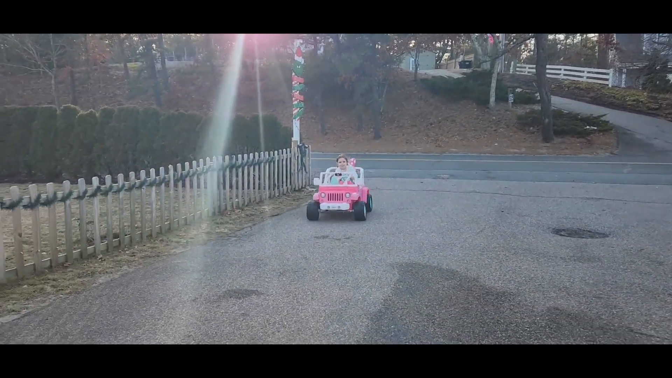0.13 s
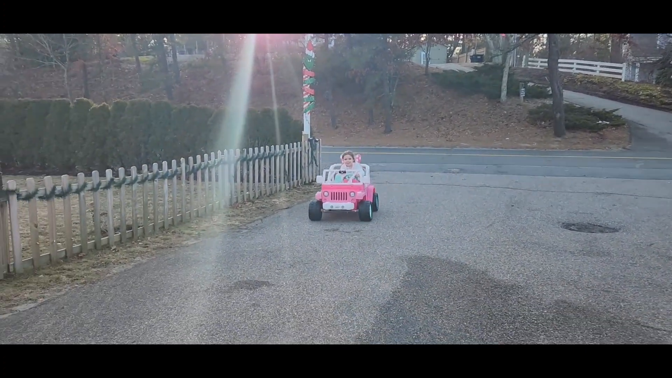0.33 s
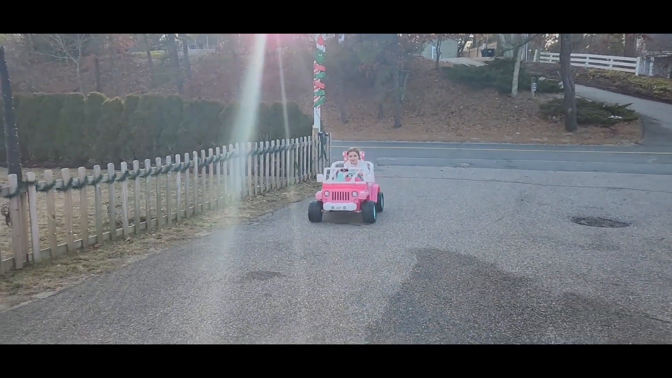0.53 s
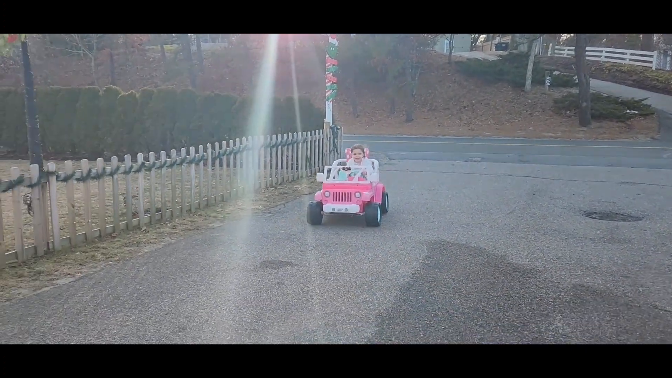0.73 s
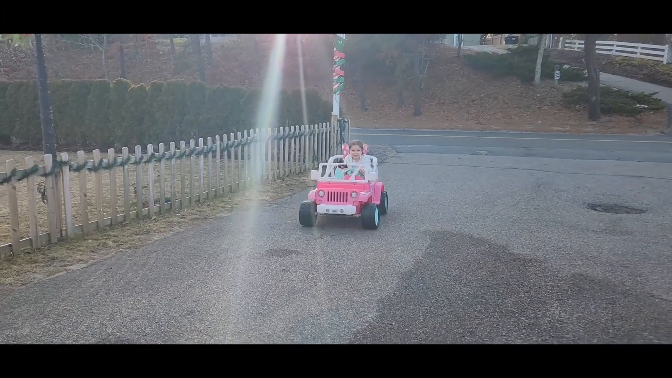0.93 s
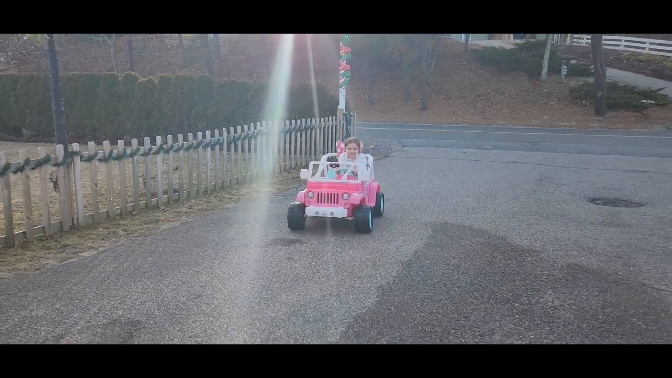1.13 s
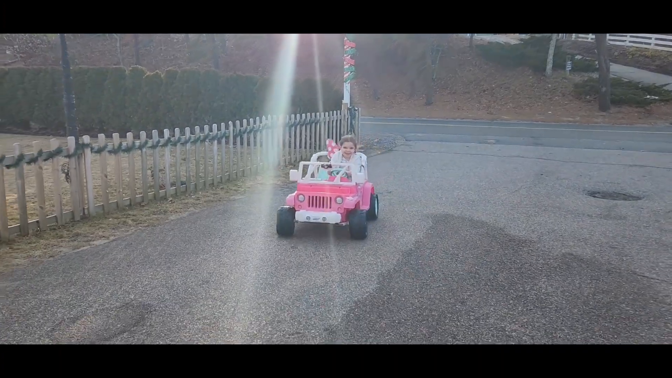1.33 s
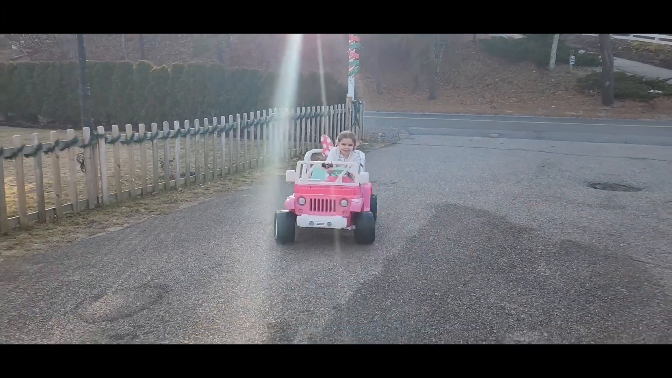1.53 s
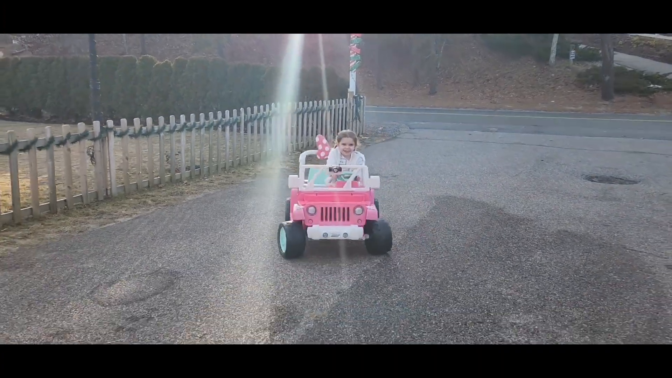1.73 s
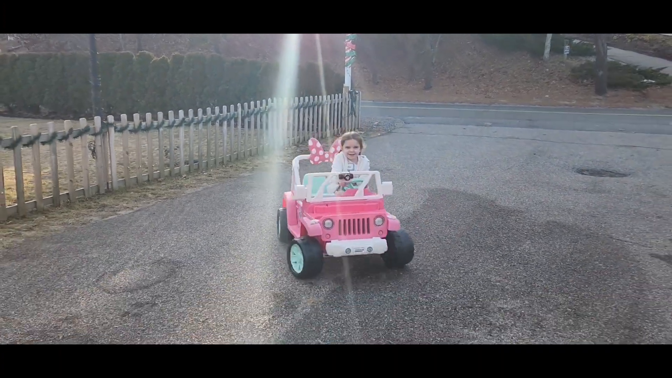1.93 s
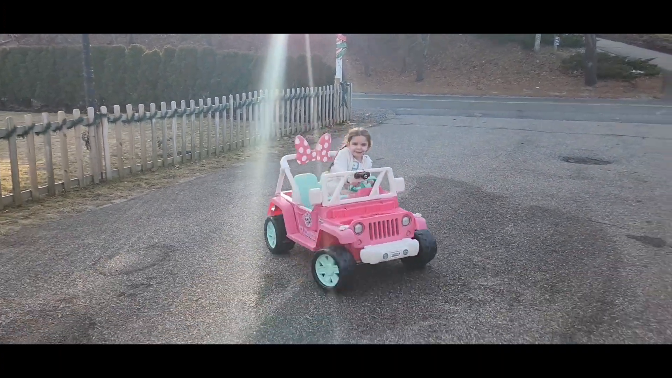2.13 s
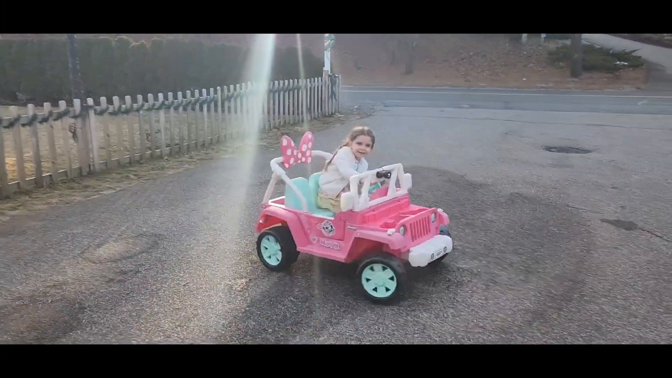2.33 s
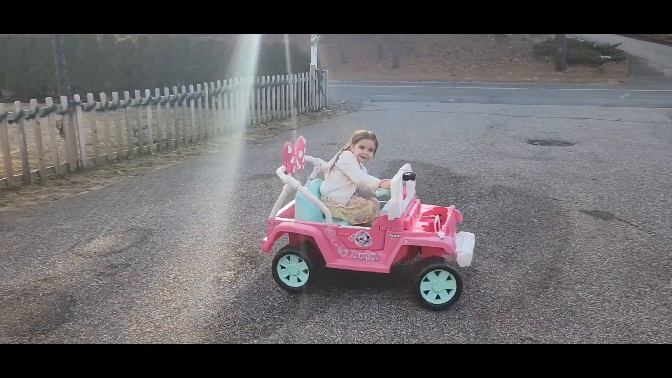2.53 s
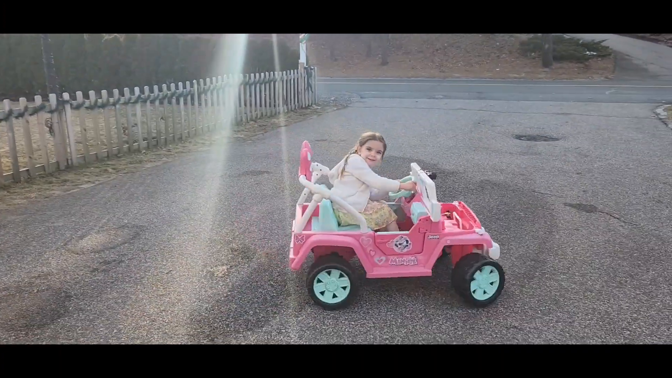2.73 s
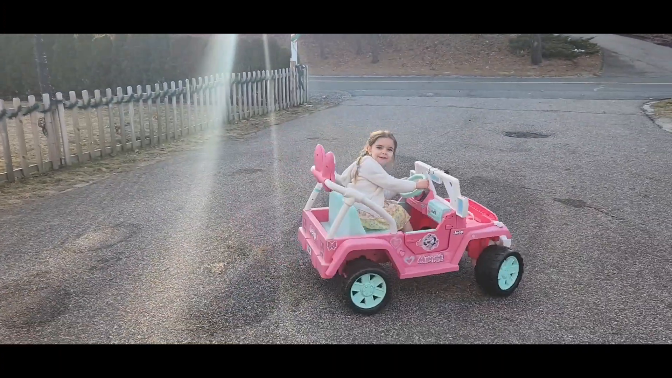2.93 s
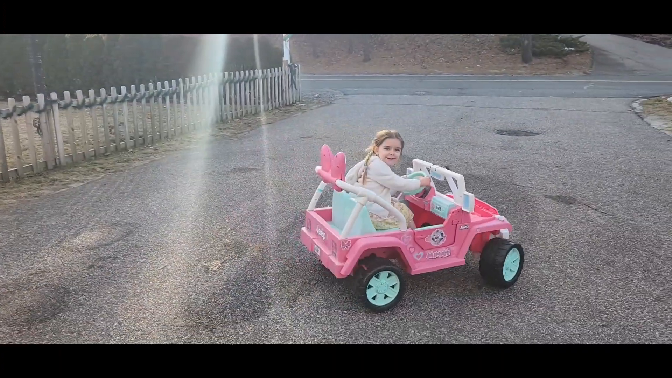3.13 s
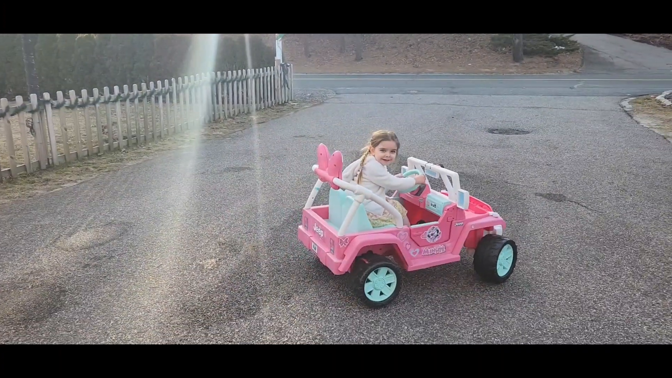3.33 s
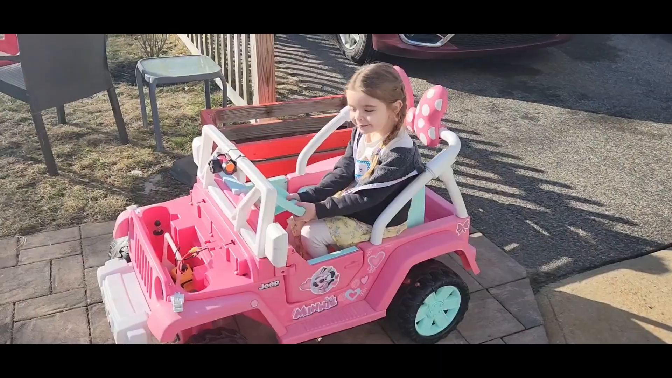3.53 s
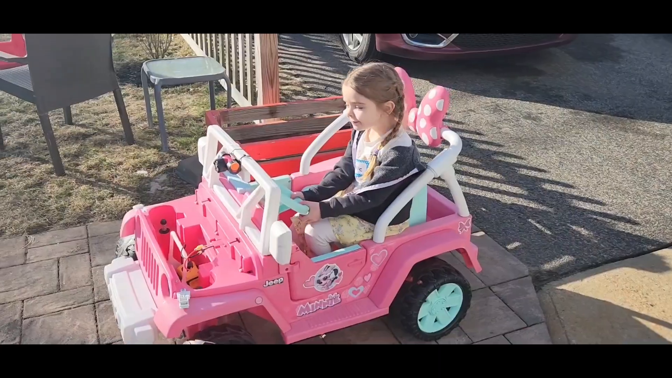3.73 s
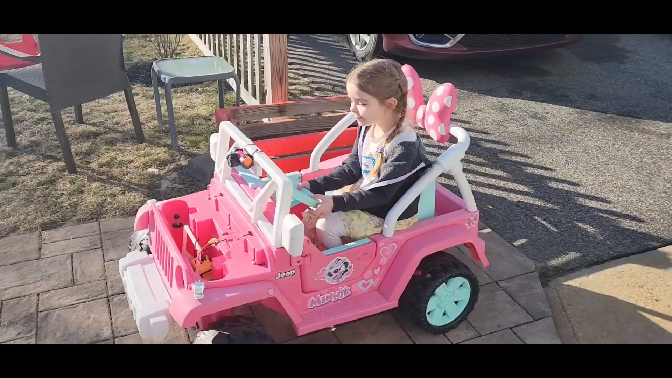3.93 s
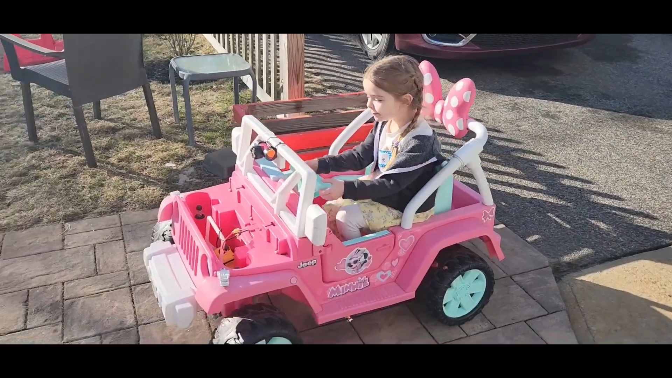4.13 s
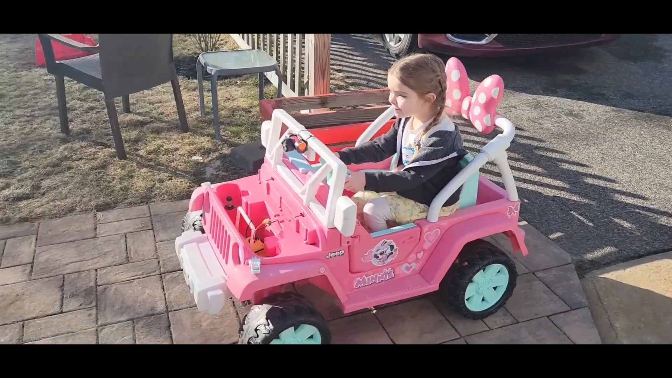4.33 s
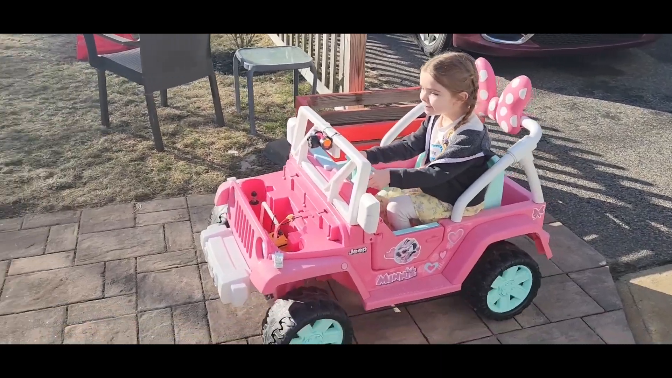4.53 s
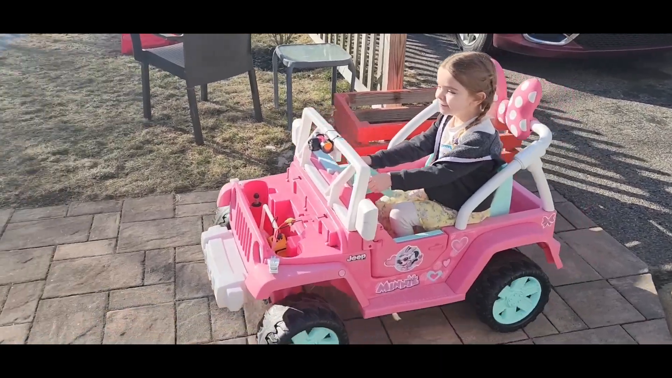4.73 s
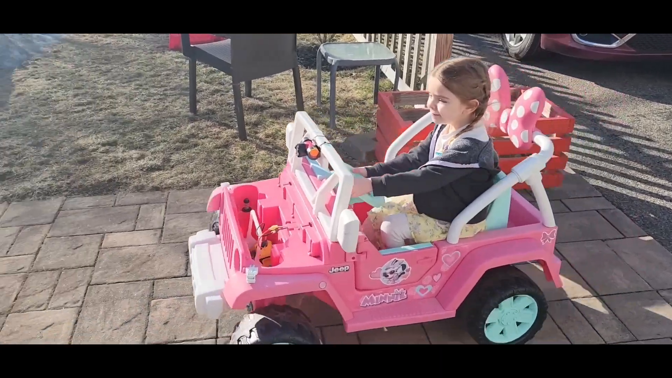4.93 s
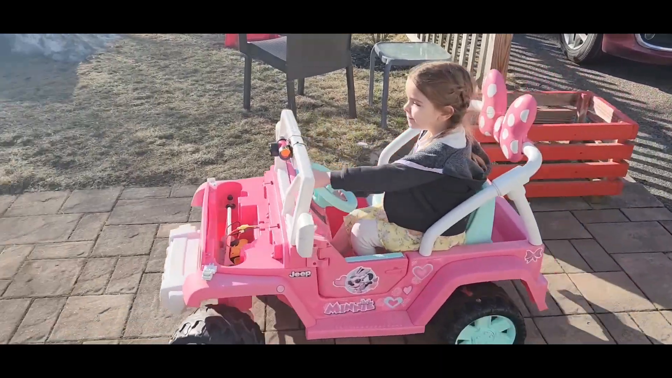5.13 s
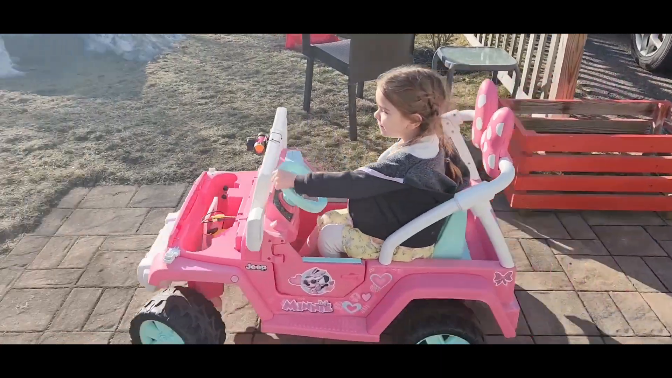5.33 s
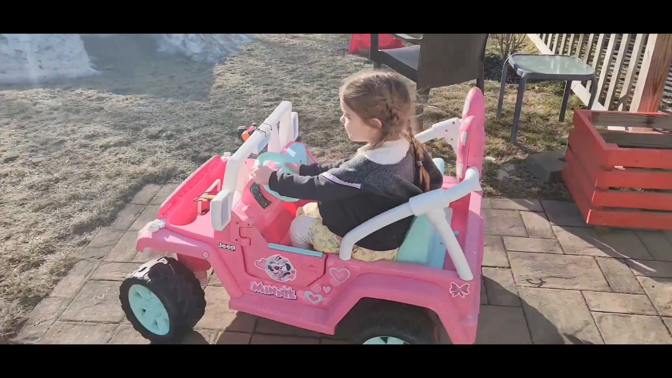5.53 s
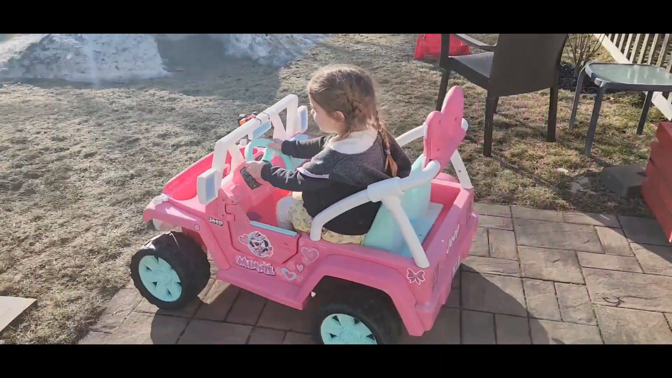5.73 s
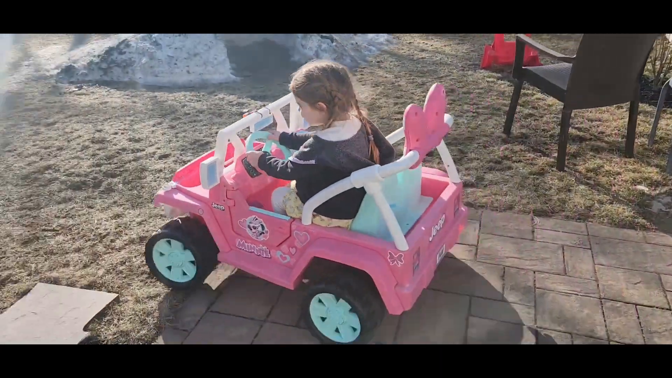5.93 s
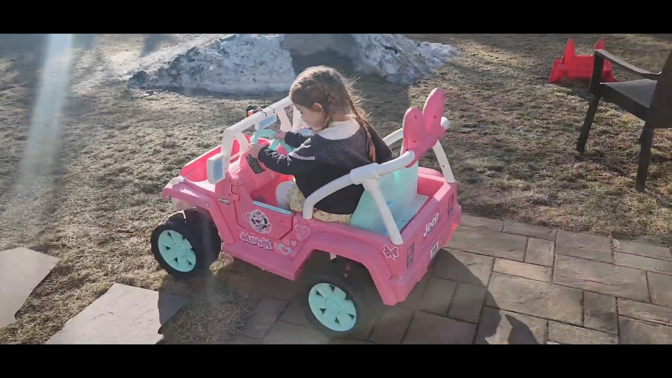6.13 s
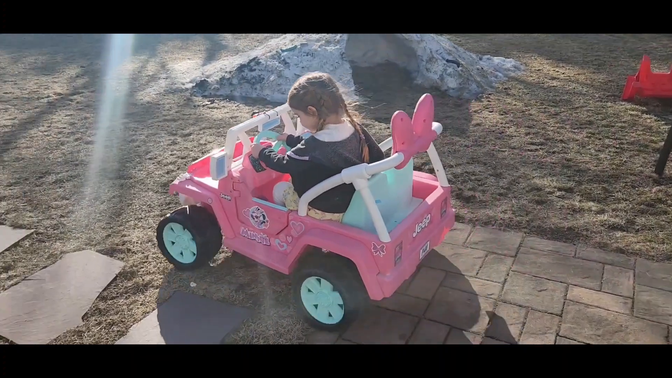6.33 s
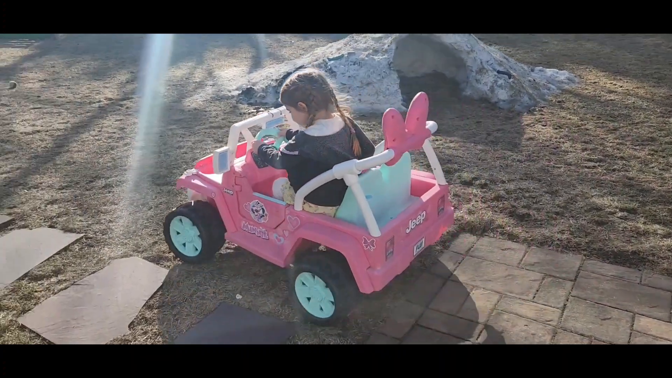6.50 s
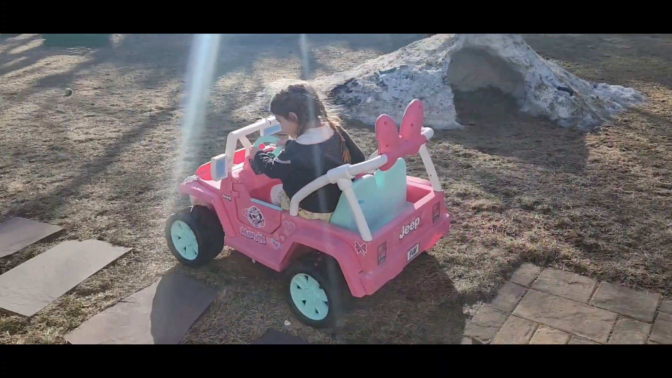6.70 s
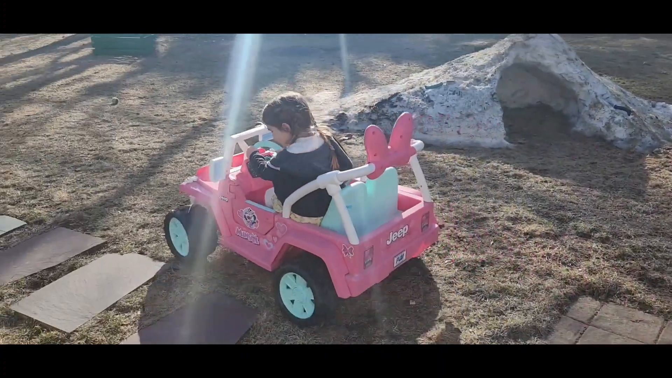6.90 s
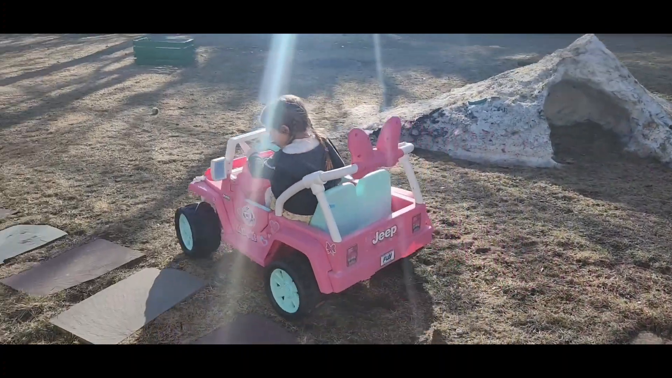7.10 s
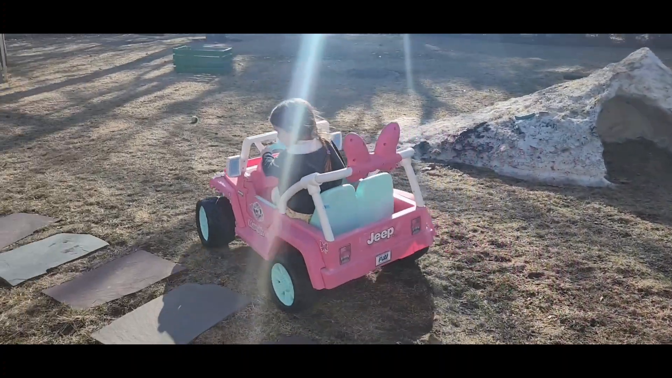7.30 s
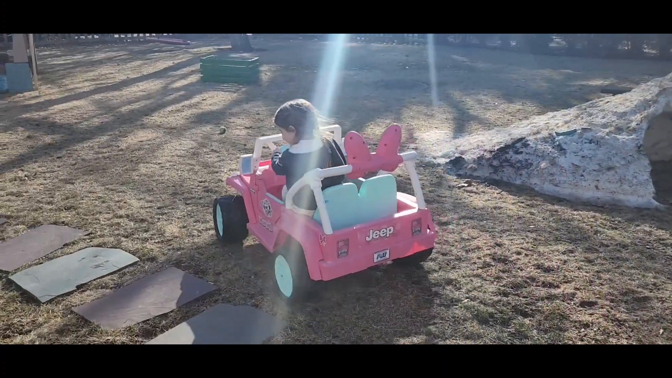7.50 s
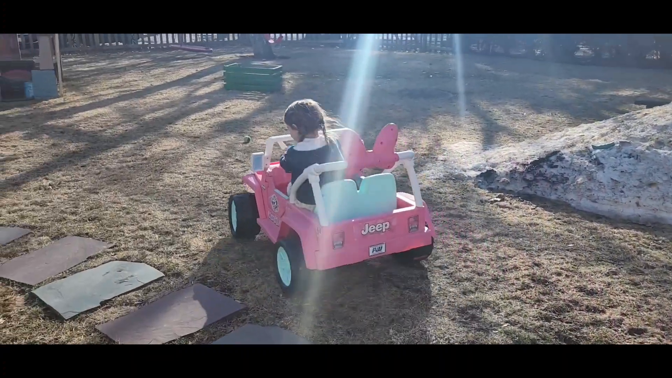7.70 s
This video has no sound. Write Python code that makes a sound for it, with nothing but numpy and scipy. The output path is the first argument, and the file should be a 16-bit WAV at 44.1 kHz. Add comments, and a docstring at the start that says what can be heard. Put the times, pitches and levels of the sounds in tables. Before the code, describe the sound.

Outdoors, a battery ride-on toy car rolls up an asphalt driveway, its hollow plastic wheels drumming, crunching and knocking while geared motors whir. It turns with heavier scrubs and stops. After a tiny gap and a quiet second of faint hiss, it jerks into motion on a paved patio, squeaking and thumping, then rattles away over a lawn. A phone microphone hears it fairly close, with low air rumble.

```python
"""Hollow plastic wheels drum and crunch up an asphalt driveway: a battery ride-on toy car rolls, turns and stops.
In a second scene it starts on a paved patio and drives off over a lawn.
Random tread bumps ring the wheels and tub and crack the grit; timed blows, slips and chirps add knocks, thumps,
scrubs, snaps and squeaks. Two geared motors whir from uneven tooth strikes and bent sines.
A phone with two microphone ports hears it outdoors, over a rumble of air and a faint far hiss."""
import sys
import numpy as np
from scipy import signal
from scipy.fft import rfft, irfft, next_fast_len
from scipy.io import wavfile
from scipy.ndimage import uniform_filter1d, map_coordinates

SR = 44100
rng = np.random.default_rng(int(sys.argv[2]) if len(sys.argv) > 2 else 0)


def dump(signal):
    """Clip the signal to [-1, 1] and save it as 16-bit WAV at the path in sys.argv[1]."""
    limited = np.clip(np.atleast_2d(signal).T, -1, 1)
    pcm = np.round(limited * 32767).astype(np.int16)
    wavfile.write(sys.argv[1], SR, pcm)


N = 342216

# Most dB in the tables are relative to their layer's gain; air and scrub levels are used as they stand.

# Air moving at the ports. Each row: time in seconds, rumble level in dB.
AIR_LEVEL = [(0, -38), (3.3, -40.5), (3.53, -53), (3.6, -43), (4.1, -40.5), (4.4, -38), (5.5, -35.5),
             (7.4, -38), (7.58, -35), (7.63, -28.5), (7.76, -34.5)]
# Colours of the air rumble and of the far hiss. Each row: frequency in Hz, level in dB.
AIR_COLOUR = [(12, -32), (20, -12), (54, 10.5), (81, 4.5), (146, -15), (187, -22), (200, -31), (260, -59),
              (440, -120)]
FAR_HISS_COLOUR = [(88, -44), (150, -2.5), (182, -3), (201, -6), (285, -5.5), (455, -12.5), (817, -10.5),
                   (1090, -15.5), (2120, -10.5), (2840, -21.5), (5520, -18.5), (6700, -20.5), (7830, -22),
                   (10700, -34.5), (15800, -27.5)]

# The two microphone ports. Each row: frequency in Hz, likeness of left and right from 0 to 1.
PORT_LIKENESS = [(40, 0.93), (120, 1), (300, .98), (600, 1), (1200, 0.38), (3000, 0.047), (12000, 0.18)]
# Each row: frequency in Hz, time in seconds by which the left port leads.
LEFT_LEAD = [(400, 0.00014), (1000, 0.00012), (3000, 0.000266)]
# The gap between the two scenes: start and end in seconds.
SCENE_GAP_S = (3.538, 3.581)
PHONE_TOP_HZ = 15650

# Stones and joints snapping. Each row: time in seconds, peak in dB.
SNAPS = [(0.263, -19), (0.342, -36), (0.7286, -17), (1.449, -17), (1.5904, -17), (1.8305, -15),
         (1.871, -12), (2.163, -13), (2.5523, -8), (2.5668, -14), (2.6027, -14), (2.622, -9), (3.259, -34),
         (3.3816, -38), (3.521, -39), (3.949, -37), (5.0454, -13), (5.271, -19), (5.6037, -20.5),
         (5.8062, -19), (5.9517, -10.5), (6.5552, -16)]
# Plastic rubbing on the axles. Each row: time in seconds, peak in dB, pitch in Hz.
SQUEAKS = [(1.224, -9, 5500), (1.46, -10, 7270), (1.869, 1.5, 6200), (2.273, -5, 6183), (4.572, -16, 4660),
           (4.615, -11, 3400), (5.043, 1.5, 3300), (6.651, -11, 3850), (6.937, -16, 4340)]
# An axle chattering. Each row: start in seconds, end in seconds, peak in dB, first pitch in Hz, last pitch in Hz.
SQUEAK_RUNS = [(4.873, 4.973, -17, 6000, 4970), (5.122, 5.203, -12.5, 4350, 4220),
               (5.24, 5.34, -13.5, 3630, 3450)]

# Course of the motors. Each row: time in seconds, pace as a share of full speed, level in dB.
MOTOR_COURSE = [(0, 0.9, -44), (1, 0.96, -28.5), (2, 0.97, -42), (2.55, 0.88, -21), (2.85, 0.76, -30.5),
                (3.01, 0.82, -30), (3.1, 0.83, -43), (3.3, 0.72, -45), (3.42, 0.47, -63), (4.52, 0.44, -93),
                (4.56, 0.81, -28.5), (4.7, 0.92, -28.5), (5.1, 1, -27.5), (5.55, 0.83, -29), (6, 1.01, -32),
                (6.75, 0.99, -31.5), (7.25, 1.02, -32.5), (7.4, 0.955, -35), (7.76, 1.02, -36.5)]
# Gearbox housing resonances. Each row: frequency in Hz, width in Hz, level in dB.
GEARBOX_MODES = [(598, 168, 9.5), (1234, 920, 5.5), (1510, 149, 8), (2000, 143, -5.5), (3280, 760, -11.5),
                 (4140, 880, -38), (7700, 210, -22)]
# Tooth rates at full pace, before each motor's own speed factor
GEAR_HZ, PINION_HZ = 578.1, 2148
# Whine against the gearboxes; its gain were the rear to face the listener fully
PINION_DB, PINION_REAR_DB = -9.5, 5
# The rear swings round toward the listener: start and end in seconds, the end lying past the last sample.
REAR_TURN_S = (7.3, 8.32)

# Blows on the tub. Each row: time in seconds, peak in dB, panel pitch in Hz, bright edge in dB.
KNOCKS = [(0.021, -13, 966, -18), (0.343, -7.5, 1210, -16), (0.743, -10.5, 780, -23),
          (0.875, -12.5, 670, -22), (1.013, -13, 650, -29), (1.138, -12.5, 611, -20),
          (1.281, -11.5, 700, -6), (1.299, -9.5, 2400, -18), (1.449, -9.5, 1930, -5),
          (1.577, -9.5, 840, -15), (1.829, -11, 1640, -10), (1.874, -9, 810, -8), (2.117, -12, 650, -6),
          (2.207, -10.5, 800, -14), (2.463, -7, 1070, -9), (2.523, -7, 1310, -24), (2.691, -8, 1210, -20),
          (2.895, -18, 1364, -7), (4.547, -27, 618, -19), (4.81, -13.5, 560, -20), (5.038, -9, 1460, -8),
          (5.065, -10, 641, -17), (5.328, -9.5, 600, -8), (5.396, -5.5, 740, -27), (5.478, -13.5, 614, -14),
          (5.536, -21, 1440, -26), (5.673, -8, 815, -26), (5.766, -9, 1470, -26), (5.834, -15, 556, -22),
          (5.95, -10, 1257, -20), (5.999, -11, 587, -22), (6.069, -39, 604, -21), (6.239, -16, 600, -33),
          (6.354, -33, 1466, -22), (6.479, -12.5, 500, -24), (6.56, -16, 1485, -16)]
# Tub resonances. Each row: frequency in Hz, width in Hz, level in dB.
TUB_MODES = [(600, 580, -6), (896, 45, 2.5), (1092, 26, 2.5), (1325, 39, 2), (1497, 61, 3),
             (2370, 180, -2.5), (2660, 250, -11.5), (3540, 430, -14)]
# A wheel drops into a crack or joint. Each row: time in seconds, peak in dB, pitch in Hz.
THUMPS = [(0.099, -13, 131), (0.695, -7.5, 200), (0.936, -7.5, 198), (1.005, -4.5, 167), (1.133, -7, 167),
          (1.313, -8, 173), (1.609, -6.5, 170), (1.779, -11, 186), (1.868, -9, 160), (2.006, -10, 210),
          (2.21, -12, 215), (2.057, -12, 150), (2.129, -1, 174), (2.305, -1, 107), (2.579, -11, 106),
          (2.693, -5, 155), (2.928, -10, 186), (3.263, -15.5, 107), (4.573, -4, 143.3), (4.784, -3, 118),
          (4.935, -2.5, 103.6), (5.062, -2, 151), (5.305, -8, 106), (5.337, -18, 171), (5.462, -11, 227),
          (5.832, -7, 240), (5.991, -4.5, 158), (6.23, -4.5, 275.3), (6.301, -14, 200), (6.412, -10, 128),
          (6.5, -7, 193), (6.606, -12, 125), (6.734, -24, 110), (6.804, -12.5, 204), (6.961, -14.5, 218)]
# A tyre slips and scrubs over grit. Each row: middle in seconds, half length in seconds, level in dB.
SCRUBS = [(0.005, 0.028, -23), (0.284, 0.025, -32), (0.733, 0.017, -27), (0.9, 0.024, -30),
          (1.076, 0.018, -25), (1.175, 0.02, -30), (1.277, 0.03, -29), (1.463, 0.018, -29),
          (1.607, 0.025, -27), (1.886, 0.037, -21), (2.125, 0.015, -23), (2.198, 0.043, -19.5),
          (2.483, 0.022, -25), (2.58, 0.088, -29), (2.722, 0.032, -14.5), (3.026, 0.033, -25.5),
          (4.796, 0.023, -22.5), (5.045, 0.022, -21), (5.815, 0.015, -31), (5.962, 0.017, -21),
          (6.68, 0.028, -33), (7.533, 0.025, -29.5)]

# How hard the car rolls, by its speed and nearness. Each row: time in seconds, level in dB.
ROLL_LEVEL = [(0, -4.5), (0.6, -5.5), (0.9, -3), (1.7, -1), (2.05, 1), (2.74, -1), (2.86, -9.5), (2.95, 4),
              (3.03, 0), (3.11, -11.5), (3.29, -19.5), (3.38, -37), (4.53, -68), (4.57, -6), (5.24, -6),
              (5.38, -0.5), (5.55, -3), (5.7, -1.5), (6.55, -5), (6.72, -10), (7.76, -9)]
# Hollow wheels and tub floor as each stretch excites them. Each row: frequency in Hz, width in Hz, level in dB.
DRUM_APPROACH = [(103, 31, -3.5), (142, 34, -2.5), (186, 34.6, -0.5), (240, 58, -6.5)]
DRUM_TURN = [(100.6, 19.5, -3), (121, 8.6, 1.5), (166, 49, -7), (257, 37, -14)]
DRUM_START = [(104, 15, -3.5), (158, 63, -11.5), (225, 36, -10.5), (298, 62, -13)]
DRUM_PATIO = [(64, 31.7, -6.5), (116.5, 28, 0), (172, 32, -2.5), (232, 37, -1), (307, 56, -5.5)]
DRUM_LAWN = [(136.8, 49, -4), (198, 17, 2), (292.4, 55, -3.5)]
# Colours of the body rattle, by side heard or ground. Each row: frequency in Hz, level in dB.
BODY_FRONT = [(160, -33), (280, -4), (319, -6), (493, 0), (763, -10), (842, -7.5), (1240, -9), (1440, -12),
              (2060, -16.5), (2250, -13.5), (2480, -19), (3000, -20.5), (3900, -23), (6600, -120)]
BODY_SIDE = [(160, -32), (280, -4.5), (297, -3), (385, -1), (508, -3), (651, -12.5), (949, -9.5),
             (1030, -11.5), (1200, -5.5), (1530, -10), (1770, -13.5), (2640, -17.5), (3000, -18.5),
             (3900, -42), (6600, -120)]
BODY_PATIO = [(160, -17), (280, -4), (366, -3.5), (446, -7.5), (561, -2.5), (657, -6.5), (851, -13.5),
              (949, -8.5), (1020, -12), (1480, -6), (1760, -18.5), (2120, -12.5), (2640, -27),
              (3000, -23.5), (3900, -55), (6600, -120)]
BODY_LAWN = [(180, -31), (300, 1), (385, -8.5), (450, 3), (578, 0.5), (630, -6), (694, -1), (866, -9),
             (1060, -4), (1220, -3), (1470, -5.5), (1570, -8.5), (2080, -3.5), (2700, -14), (3000, -14),
             (3900, -50), (6600, -120)]
# Colours of the grit on each ground. Each row: frequency in Hz, level in dB.
GRIT_ASPHALT = [(1470, -4.5), (2500, -2.5), (3540, -2), (5080, -5.5), (6210, -3), (7530, -4), (8590, -12.5),
                (9720, -18.5), (12600, -11.5), (13900, -14.5), (15000, -21), (15800, -12)]
GRIT_PAVERS = [(1470, -36), (2500, 2.5), (2680, -7), (3330, -1.5), (4160, -1.5), (5240, -4.5), (7420, -4),
               (9420, -18.5), (12200, -10.5), (14700, -10), (15400, -18), (15800, -21)]
GRIT_LAWN = [(1470, -17), (2500, -5), (3560, -7.5), (4320, -8), (5200, -12.5), (7250, -11.5), (9720, -30),
             (11200, -21.5), (13000, -17), (15000, -25), (15800, -19)]


def amp(db):
    """Decibels to an amplitude factor."""
    return 10 ** (np.asarray(db) / 20)


def unit(x):
    """x scaled to rms 1."""
    return x / np.sqrt(np.mean(x ** 2) + 1e-20)


def peaked(x):
    """x scaled to a peak of 1."""
    return x / np.abs(x).max()


def along(points, hz):
    """(Hz, value) points read on a log frequency axis."""
    f, v = np.transpose(points)
    return np.interp(np.log(hz + 1), np.log(f + 1), v)


def curves(rows):
    """One value per sample for each column after the time."""
    s, *cols = np.transpose(rows)
    return [np.interp(np.arange(N) / SR, s, c) for c in cols]


def wobble(rate):
    """A smooth random curve, rate knots a second."""
    knots = rng.standard_normal(int(N * rate / SR) + 4)
    return map_coordinates(knots, [np.arange(N) * rate / SR])


def add(out, s, x):
    """Mix x into out from time s."""
    part = out[:, max(round(s * SR), 0):][:, :x.shape[1]]
    part += x[:, :part.shape[1]]


def filtered(x, response):
    """x times a complex response of frequency."""
    n = x.shape[-1]
    m = next_fast_len(n + 8192)
    return irfft(rfft(x, m) * response(np.fft.rfftfreq(m, 1 / SR)), m)[..., :n]


def coloured(x, spectrum):
    """x through a causal minimum-phase filter with the given (Hz, dB) points."""
    size = 8192
    db = np.maximum(along(spectrum, np.fft.rfftfreq(size, 1 / SR)), -90)
    cepstrum = irfft(np.log(amp(db)))
    # folding the cepstrum forward in time makes the filter causal
    cepstrum[1:size // 2] *= 2
    cepstrum[size // 2 + 1:] = 0
    kernel = irfft(np.exp(rfft(cepstrum)))
    return signal.fftconvolve(x, kernel[None], axes=1)[:, :x.shape[1]]


def resonate(x, modes):
    """x through a sum of resonances (Hz, width in Hz, dB) of alternating sign."""
    def response(f):
        return sum((-1) ** k * amp(db) * 1j * f * width / (hz * hz - f * f + 1j * f * width)
                   for k, (hz, width, db) in enumerate(modes))
    return filtered(x, response)


def ports(pair):
    """Two unrelated signals become left and right of joint rms 1, alike in the bass."""
    def mid_side_gains(hz):
        turn = np.arccos(np.clip(along(PORT_LIKENESS, hz), 0, .999)) / 2
        return np.array([np.cos(turn), np.sin(turn)])
    mid, side = filtered(pair, mid_side_gains)
    return unit(np.array([mid + side, mid - side]))


def burst(t60):
    """The dense ring of one contact at two ports, 60 dB down after t60 seconds."""
    t = np.arange(SR // 5) / SR
    return rng.standard_normal((2, len(t))) * amp(-60 * t / t60)


def strike(t60, ring):
    """A hard contact: a sharp kick of force with a dense ring."""
    x = ring * burst(t60)
    x[:, 0] += [1, .5]
    return x


def contacts(n, rate, spread_db, t60, count=6):
    """n samples of random small impacts, rate a second, shared among count parts that each ring in their own way."""
    out = np.zeros((2, n))
    for _ in range(count):
        hit = rng.random(n) < rate / count / SR
        size = amp(spread_db * np.clip(rng.standard_normal(n), -2, 2))
        out += signal.oaconvolve((hit * size)[None], burst(t60), axes=1)[:, :n]
    return out


def outdoors():
    """Air rumbles at the ports over a faint far hiss, which is louder by the patio."""
    air_db, = curves(AIR_LEVEL)
    rumble = amp(air_db + wobble(6.5)) * ports(coloured(rng.standard_normal((2, N)), AIR_COLOUR))
    hiss_gain = np.where(np.arange(N) < SCENE_GAP_S[0] * SR, amp(-62), amp(-44.5))
    return rumble + hiss_gain * ports(coloured(rng.standard_normal((2, N)), FAR_HISS_COLOUR))


def snaps():
    """A stone or joint lets go with a sharp tick and a short plastic ring."""
    out = np.zeros((2, N))
    for s, db in SNAPS:
        tick_and_ring = burst(t60=0.0065) + 0.21 * burst(t60=0.19)
        add(out, s, amp(db + 10.5) * peaked(ports(coloured(tick_and_ring, GRIT_ASPHALT))))
    return out


def chirp(hz, rise=0.0091, waver=0.036, sag=0.73):
    """A brief, scratchy stick-slip squeak: it swells in rise seconds and sags by a share of its pitch a second."""
    t = np.arange(SR // 10) / SR
    swell = (t / rise) ** 2 * np.exp(2 - 2 * t / rise)
    scratch = unit(uniform_filter1d(rng.standard_normal((2, len(t))), 60))
    pitch = hz * (1 - sag * (t - rise) + waver * scratch)
    return swell * np.sin(2 * np.pi * np.cumsum(pitch, axis=1) / SR)


def squeaks(rate=27, scatter=0.02, spread_db=2):
    """Axles squeak singly, and in runs of rate a second, unevenly timed, while the pitch drifts."""
    out = np.zeros((2, N))
    for s, db, hz in SQUEAKS:
        add(out, s - .006, amp(db - 15.5) * chirp(hz))
    for start, end, db, first_hz, last_hz in SQUEAK_RUNS:
        for s in np.arange(start, end, 1 / rate):
            late, size, detune = rng.standard_normal(3)
            hz = np.interp(s, [start, end], [first_hz, last_hz]) * (1 + scatter * detune)
            add(out, s + 0.12 * late / rate, amp(db - 12.5 + spread_db * size) * chirp(hz))
    return out


def gearbox(speed, wander=.018, rough=0.71, rasp=1.0, order=5):
    """Uneven plastic teeth strike once each and ring the housing; the load swings once a shaft turn of order teeth."""
    pace, db = curves(MOTOR_COURSE)
    teeth = np.cumsum(GEAR_HZ * pace * speed * (1 + wander * wobble(17))) / SR
    strikes = np.diff(np.floor(teeth), prepend=0) * (1 + rough * rng.standard_normal((2, N)))
    # noise that fades as each tooth slides through its mesh
    sliding = rng.standard_normal((2, N)) * np.exp(-3 * (teeth % 1))
    swing = 1 + 0.081 * np.sin(2 * np.pi * teeth / order)
    force = (unit(strikes) + rasp * unit(sliding)) * swing
    return amp(db - 3.5 + 1.35 * wobble(7)) * ports(resonate(force, GEARBOX_MODES))


def pinion(speed, load_swing=0.0065):
    """A motor's small gear whines with its octave; the load bends its pitch, backlash makes it flutter and rasp."""
    pace, db = curves(MOTOR_COURSE)
    unsteady = 1 + load_swing * wobble(7) + .009 * wobble(25) + .016 * wobble(700)
    phase = 2 * np.pi * np.cumsum(PINION_HZ * pace * speed * unsteady) / SR

    def paths():
        """The shaking body scatters the whine on its way to each port."""
        return np.array([wobble(110), wobble(110)])

    rear = np.interp(np.arange(N) / SR, REAR_TURN_S, [0, 1])
    octave = 0.47 + 1.0 * rear
    whine = paths() * np.sin(phase) + octave * paths() * np.sin(2 * phase)
    return amp(db + PINION_DB + PINION_REAR_DB * rear) * ports(whine)


def knocks(focus_db=4, panel_width_hz=230, rebound=0.42):
    """A jolt slaps the tub and rebounds; the panel that is struck rings most, under a bright edge."""
    out = np.zeros((2, N))
    gaps_s = rng.uniform(0.00304, .007, len(KNOCKS))
    for (s, db, hz, edge_db), gap in zip(KNOCKS, gaps_s):
        for delay, size in (0, 1), (gap, rebound):
            blow = strike(t60=0.088, ring=0.081)
            struck_panel = amp(focus_db) * resonate(blow, [(hz, panel_width_hz, 0)])
            panel = peaked(ports(resonate(blow, TUB_MODES) + struck_panel))
            edge = peaked(ports(coloured(strike(t60=0.1, ring=0.12), GRIT_ASPHALT)))
            add(out, s + delay, size * amp(db + 5.0) * (panel + amp(edge_db + 4.5) * edge))
    return out


def thumps(cycles=9, attack=0.0057):
    """The hollow wheel booms, dying by 60 dB in a few cycles."""
    out = np.zeros((2, N))
    t = np.arange(SR // 4) / SR
    for s, db, hz in THUMPS:
        boom = np.sin(2 * np.pi * hz * t) * amp(-60 * t * hz / cycles) * (1 - np.exp(-t / attack))
        add(out, s, amp(db - 6) * peaked(boom)[None])
    return out


def stirred(blows, rise_s):
    """Each blow sets loose parts shaking: their level swells in rise_s and dies away."""
    power = np.zeros((1, N))
    t = np.arange(SR // 4) / SR
    swell = t / rise_s * np.exp(1 - t / rise_s)
    for s, db, *_ in blows:
        add(power, s, (amp(db) * swell[None]) ** 2)
    return np.sqrt(power[0])


def scrubbing():
    """Each slip of a tyre is one swell of crunching."""
    t = np.arange(N) / SR
    return sum(amp(db) / (1 + ((t - s) / half) ** 4) for s, half, db in SCRUBS)


def flexing(x, depth_db):
    """As the shell flexes, its resonances come and go: random patches of gain over time and frequency."""
    z = signal.stft(x, nperseg=512)[2]
    field = uniform_filter1d(rng.standard_normal(z.shape[1:]), size=3, axis=0)
    field = uniform_filter1d(field, size=7, axis=1)
    return signal.istft(z * amp(depth_db * unit(field)), nperseg=512)[1][:, :x.shape[1]]


def rolling(span, drum, body_colour, grit_colour, jolts, rate, wheel_db, body_db, grit_db, grit_spread_db,
            wheel_grows=1.0, grit_grows=1.21, uneven_db=1.39, fade=0.005):
    """Treads bump rate times a second: wheels drum, body buzzes, grit cracks, growing with the rolling and jolts."""
    start, end = span
    n = round((end - start + .1) * SR)  # 50 ms of margin at either end
    t = start - .05 + np.arange(n) / SR

    bumps = resonate(contacts(n, rate=rate, spread_db=1.5, t60=0.0092), drum)
    wheels = coloured(bumps, [(35, -20.5), (90, 2.5), (320, -2.5), (700, -17), (2000, -81)])
    buzz = contacts(n, rate=1.8 * rate, spread_db=0.0, t60=0.048)
    body = coloured(flexing(buzz, depth_db=2.0), body_colour)
    cracks = contacts(n, rate=3 * rate, spread_db=grit_spread_db, t60=0.085)
    grit = coloured(flexing(cracks, depth_db=2.0), grit_colour)

    roll_db = np.interp(t, *np.transpose(ROLL_LEVEL))
    steady_db = wheel_db + wheel_grows * roll_db, body_db + roll_db, grit_db + grit_grows * roll_db
    sound = np.zeros((2, n))
    for db, jolt, layer in zip(steady_db, jolts, (wheels, body, grit)):
        steady = amp(db + uneven_db * wobble(34.91)[:n])
        jolted = np.interp(t, np.arange(N) / SR, jolt)
        sound += np.hypot(steady, jolted) * ports(layer)
    # equal-power fades at both ends, so adjoining stretches crossfade
    sound *= np.sqrt(np.interp(t, [start - fade, start + fade, end - fade, end + fade], [0, 1, 1, 0]))
    out = np.zeros((2, N))
    add(out, t[0], sound[:, t >= 0])
    return out


def ride():
    """Thumps stir the wheels, knocks the body, slips the grit; each ground has its own drum, rattle and crunch."""
    wheel_jolts = amp(-12.5) * stirred(THUMPS, rise_s=0.016)
    body_jolts = amp(-13.5) * stirred(KNOCKS, rise_s=0.016)
    jolts = wheel_jolts, body_jolts, scrubbing()
    # stretches in seconds
    approach, turn, start, patio, lawn = (0, 2.25), (2.25, 3.54), (4.53, 5.3), (5.3, 6.7), (6.7, 7.8)
    return (rolling(approach, DRUM_APPROACH, BODY_FRONT, GRIT_ASPHALT, jolts, rate=560,
                    wheel_db=-20.0, body_db=-18.0, grit_db=-27.5, grit_spread_db=2.0)
            + rolling(turn, DRUM_TURN, BODY_SIDE, GRIT_ASPHALT, jolts, rate=380,
                      wheel_db=-16.5, body_db=-19.5, grit_db=-24, grit_spread_db=0.5, wheel_grows=0.81)
            + rolling(start, DRUM_START, BODY_PATIO, GRIT_PAVERS, jolts, rate=400,
                      wheel_db=-17.5, body_db=-19.5, grit_db=-24.5, grit_spread_db=5.5)
            + rolling(patio, DRUM_PATIO, BODY_PATIO, GRIT_PAVERS, jolts, rate=360,
                      wheel_db=-19.5, body_db=-17.5, grit_db=-29, grit_spread_db=2.0)
            + rolling(lawn, DRUM_LAWN, BODY_LAWN, GRIT_LAWN, jolts, rate=520,
                      wheel_db=-24.5, body_db=-18.5, grit_db=-23.0, grit_spread_db=1))


def scene():
    """Car and air together reach the left port slightly sooner and 1 dB louder than the right."""
    motors = gearbox(speed=1.0) + gearbox(speed=0.9) + pinion(speed=0.87) + pinion(speed=0.94)
    car = ride() + motors + knocks() + thumps() + snaps() + squeaks()

    def port_delay(hz):
        """Half the lead forward on the left, half back on the right."""
        return np.exp(1j * np.pi * hz * along(LEFT_LEAD, hz) * np.array([[1], [-1]]))

    heard = filtered(outdoors() + car, port_delay)
    return heard * amp([[.5], [-.5]])


def record(dry):
    """The level drops 35 dB in the gap between the two scenes; the phone keeps nothing above its band limit."""
    t = np.arange(N) / SR
    in_gap = (t > SCENE_GAP_S[0]) & (t < SCENE_GAP_S[1])
    return filtered(dry * np.where(in_gap, amp(-35), 1), lambda hz: hz < PHONE_TOP_HZ)


dry = scene()
out = record(dry)
dump(out)
```